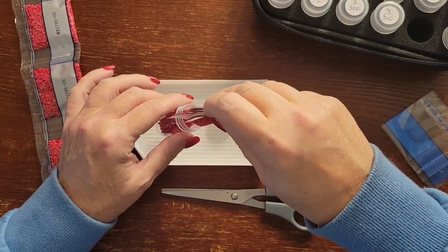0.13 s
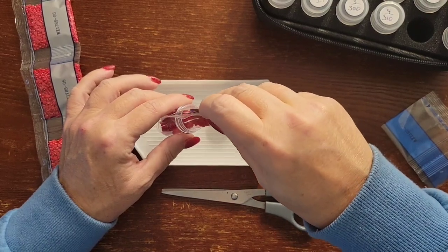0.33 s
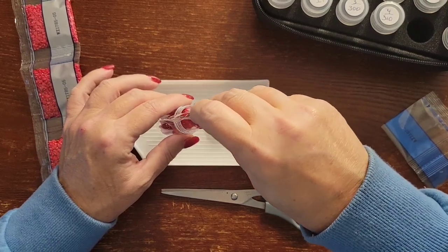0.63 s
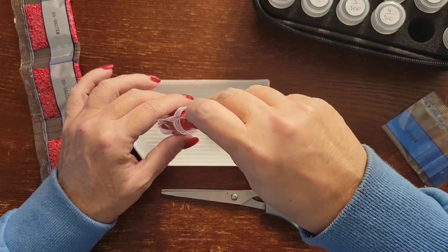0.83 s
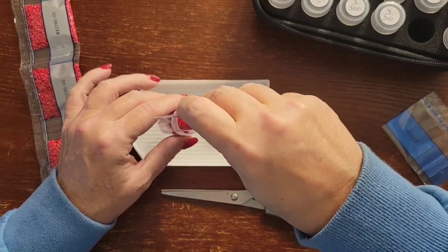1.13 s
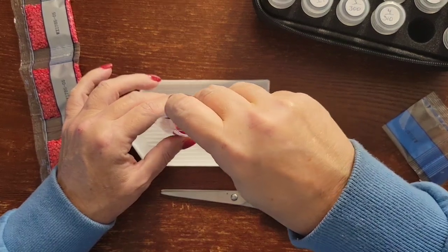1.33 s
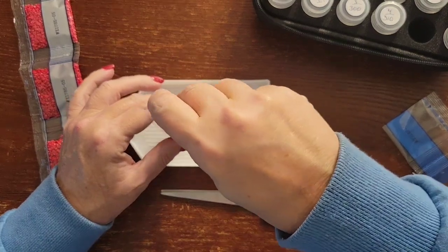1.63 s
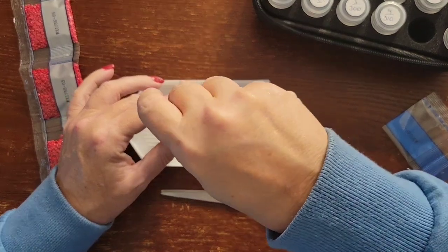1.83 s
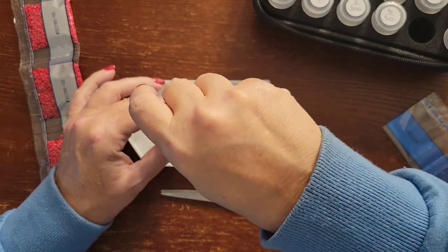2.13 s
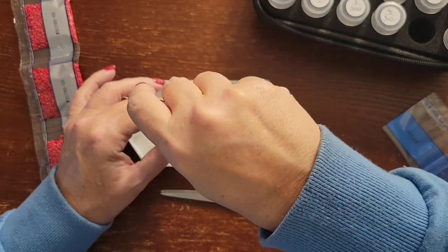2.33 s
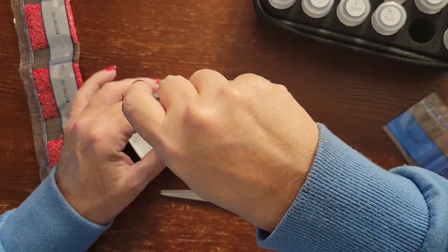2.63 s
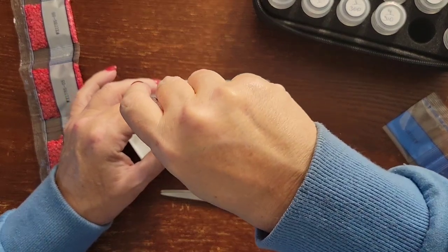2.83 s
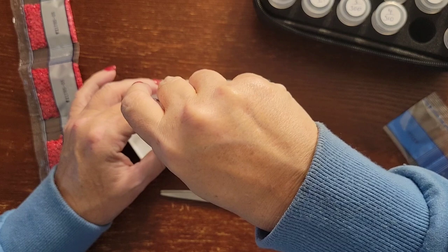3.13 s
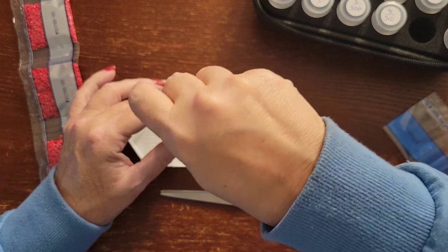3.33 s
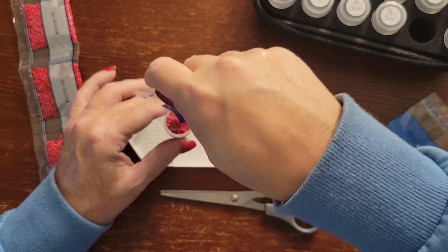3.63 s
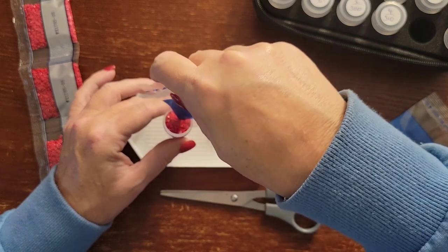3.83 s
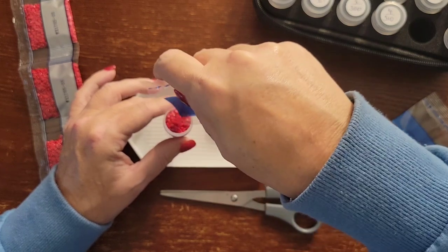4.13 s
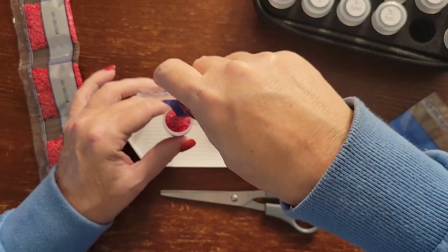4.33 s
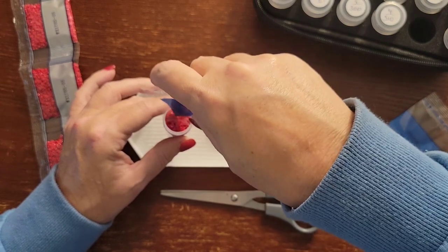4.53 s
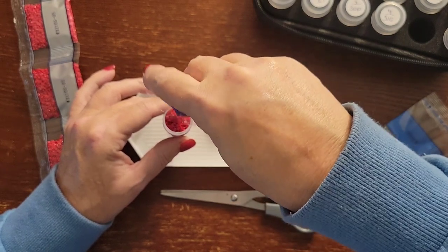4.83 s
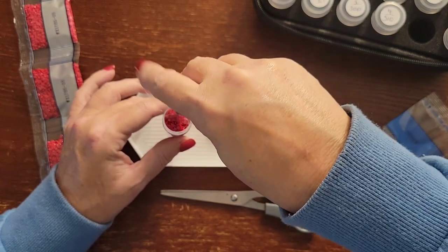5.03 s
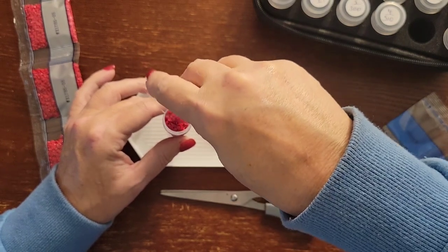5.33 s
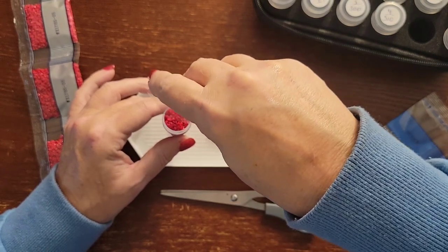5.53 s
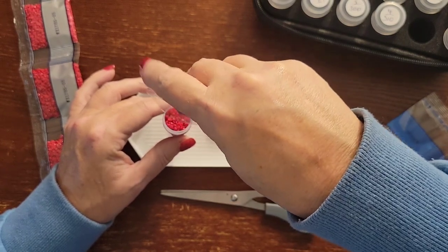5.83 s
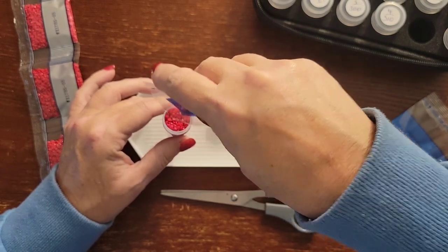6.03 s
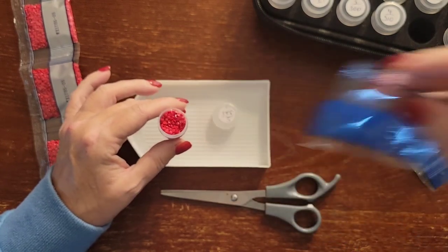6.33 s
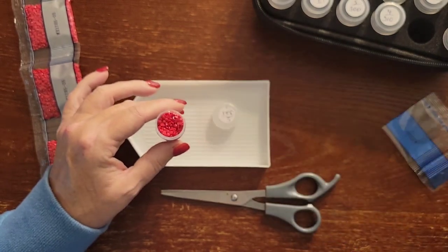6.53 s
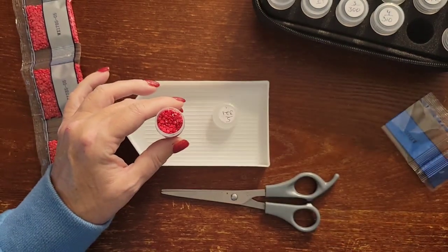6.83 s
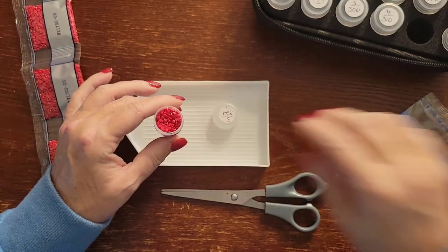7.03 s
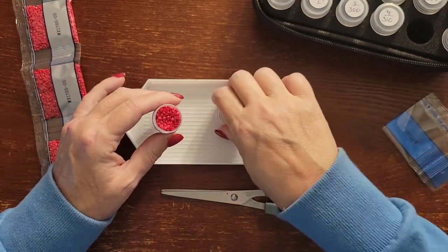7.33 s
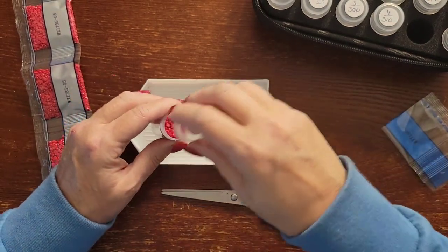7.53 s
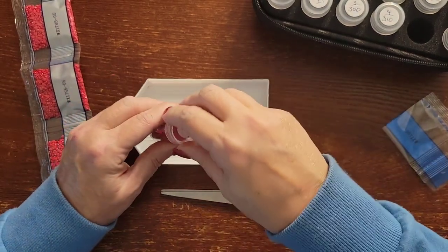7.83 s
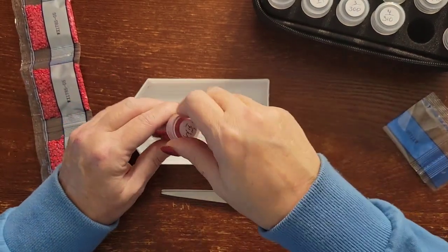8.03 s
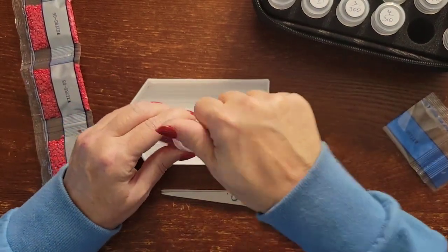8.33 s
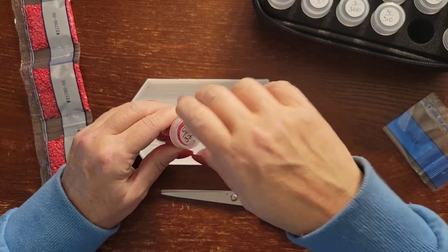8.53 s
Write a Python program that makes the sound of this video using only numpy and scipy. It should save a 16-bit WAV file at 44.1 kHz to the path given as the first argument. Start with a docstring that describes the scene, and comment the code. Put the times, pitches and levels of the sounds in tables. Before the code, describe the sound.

Close, dry handling sounds in a small hard room with faint hiss, low air and hum. From 0 s a thin trickle of tiny beads patters brightly into a small plastic jar, with sharp plastic snaps near 0.65, 1.5 and 2.1 s. From about 1 s the stream thickens into a dense granular rush, peaking around 1.7 and 2.2 s, then breaks into bursts and stops by 2.8 s; a soft low rumble swells near 1.5 s. A hard snap comes at 3.3 s, then light film ticks and scrapes. A crackling cluster of loud snaps hits at 4.7-4.8 s, followed by scattered small ticks until 6 s. Strong flicks of the bag sound at 6.2-6.4 s and a bright crinkling burst at 6.6-6.8 s. At 7.25 s a lid is picked up with a loud click, scrape and low bump; it clicks at 7.6 s, grates faintly around 8.1-8.2 s, and ends with a tick at 8.6 s.

```python
"""Beads poured into a small jar

Tiny beads pour from a thin plastic bag into a small jar on a tray: coloured streams of random clicks.
Film and plastic snap as filtered impulses; film crinkles, scrapes and lid grating are shaped slips.
A small hard room answers snaps and hands; low bumps, air, hums and a rumble swell lie beneath.
"""
import sys
import numpy as np
from scipy import signal
from scipy.fft import rfft, irfft
from scipy.io import wavfile
from scipy.ndimage import uniform_filter1d

SR = 44100
rng = np.random.default_rng(int(sys.argv[2]) if len(sys.argv) > 2 else 0)


def int16_out(signal):
    """Quantize to a 16-bit WAV file."""
    q = np.round(np.clip(np.atleast_2d(signal).T, -1, 1) * 32767)
    wavfile.write(sys.argv[1], SR, q.astype(np.int16))


N = 382645


def gain_of(db):
    """Amplitude ratio of a level in dB."""
    return 10 ** (np.asarray(db) / 20)


def evened(x):
    """Scale to unit RMS."""
    return x / np.sqrt(np.mean(x ** 2) + 1e-20)


def peaked(x):
    """Scale to unit peak."""
    return x / (abs(x).max() + 1e-12)


def read(points, hz):
    """Interpolate (Hz, value) points over log frequency."""
    f, value = np.transpose(points)
    return np.interp(np.log(hz + 1), np.log(f + 1), value)


def add(mix, s, sound):
    """Mix a sound in at s seconds, cut at the end of the mix."""
    part = mix[round(s * SR):][:len(sound)]
    part += sound[:len(part)]


def ring(x, hz, width):
    """A two-pole resonance."""
    r = np.exp(-np.pi * width / SR)
    return signal.lfilter([1, 0, -1], [1, -2 * r * np.cos(2 * np.pi * hz / SR), r * r], x)


def band(x, lo_hz, hi_hz):
    """Butterworth band-pass."""
    return signal.sosfilt(signal.butter(2, [lo_hz, hi_hz], "bandpass", fs=SR, output="sos"), x)


def coloured(x, points):
    """Shape the spectrum by (Hz, dB) points, at unit RMS."""
    gain = gain_of(read(points, np.fft.rfftfreq(len(x), 1 / SR)))
    return evened(irfft(rfft(x) * gain, len(x)))


def grains(per_s, spread_db):
    """Sparse clicks of random sign and size, at unit RMS."""
    sign, size, chance = rng.standard_normal(N), rng.exponential(1, N), rng.random(N)
    size_gain = gain_of(spread_db * np.minimum(size, 3))
    return evened(sign * size_gain * (chance < per_s / SR))


def played(x, s, db, tilt, patchy_db, flicker_db):
    """Give a steady stream its level, tilt about 5 kHz [dB per octave], drifting patches and quick flicker."""
    hz, t, z = signal.stft(x, SR, nperseg=256, noverlap=192)
    tilt_at_t = np.interp(t, s, tilt * np.ones(len(s)))
    slope = gain_of(np.outer(np.log2((hz + 100) / 5000), tilt_at_t))
    # the tilt leaves the power unchanged
    power = np.mean(abs(z) ** 2, 1)
    slope /= np.sqrt(power @ slope ** 2 / power.sum())
    patches = rng.standard_normal((len(t), len(hz))).T
    patches = evened(uniform_filter1d(uniform_filter1d(patches, size=12, axis=0), size=14, axis=1))
    flicker = evened(uniform_filter1d(rng.standard_normal(len(t)), size=9))
    level = gain_of(np.interp(t, s, db, -120, -120) + patchy_db * patches + flicker_db * flicker)
    return signal.istft(z * slope * level, SR, nperseg=256, noverlap=192)[1][:N]


def causal(gain):
    """Minimum-phase impulse response of this magnitude, by folding the cepstrum."""
    cepstrum = irfft(np.log(gain + 1e-4))
    cepstrum[1:len(gain) - 1] *= 2
    cepstrum[len(gain):] = 0
    return irfft(np.exp(rfft(cepstrum)))


def beads():
    """Random bead impacts, thousands a second; the jar's modes ring in the thin trickle only."""
    # thin trickle into the nearly empty jar: (time [s], level [dB])
    trickle = [(0, -42.5), (.15, -47.5), (.24, -43.5), (.4, -47.5), (.7, -40.5), (.95, -45.5), (1.1, -42),
               (1.3, -46.5), (2, -48)]
    # thick stream of beads onto beads: (time [s], level [dB])
    pour = [(.95, -53), (1.1, -45.5), (1.41, -38.5), (1.67, -35.5), (1.95, -41), (2.04, -49.5),
            (2.19, -33.5), (2.34, -52), (2.45, -38.5), (2.59, -40), (2.72, -65), (2.85, -70)]
    # trickle spectrum: (frequency [Hz], relative level [dB per Hz])
    trickle_colour = [(290, -39), (500, -1.5), (1010, -8.5), (1750, -4.5), (3430, -6.5), (5200, -9),
                      (5830, -7.5), (10800, -8), (15500, -16.5)]
    # pour spectrum: (frequency [Hz], relative level [dB per Hz])
    pour_colour = [(290, -17), (500, -12), (839, -3.5), (1250, -10), (3280, -3.5), (3740, 1.5), (4440, -3),
                   (4840, 1.5), (9930, 1.5), (15500, -12.5)]
    # jar resonances: (frequency [Hz], width [Hz], level [dB re dry trickle])
    jar_modes = [(1770, 250, -13), (3760, 250, -15), (5170, 300, -10), (6300, 250, -15), (10000, 500, -13),
                 (11200, 600, -10)]
    trickle_tilt_db_per_octave, pour_tilt_db_per_octave = 2.04, 0.23  # at 0 s
    brighten_db_per_octave_per_s = 0.45  # the beads sound brighter as the jar fills

    few = coloured(grains(per_s=4000, spread_db=1.8), trickle_colour)
    jar = sum(gain_of(db) * evened(ring(few, hz, w)) for hz, w, db in jar_modes)
    many = coloured(grains(per_s=5000, spread_db=-0.5), pour_colour)

    trickle_s, trickle_db = np.transpose(trickle)
    trickle_tilt = trickle_tilt_db_per_octave + brighten_db_per_octave_per_s * trickle_s
    thin = played(evened(few + jar), trickle_s, trickle_db, trickle_tilt, patchy_db=1.5, flicker_db=1.54)

    pour_s, pour_db = np.transpose(pour)
    pour_tilt = pour_tilt_db_per_octave + brighten_db_per_octave_per_s * pour_s
    thick = played(many, pour_s, pour_db, pour_tilt, patchy_db=2.2, flicker_db=1.5)
    return thin + thick


def snap(db, ring_hz, bands_db, chatter_s, noise):
    """One sharp release and a dying chatter of smaller slips pass through the colour of the plastic."""
    # knock, mid, crack and tick bands: (low edge [Hz], high edge [Hz])
    snap_bands = [(400, 1500), (1500, 3000), (3000, 9000), (9000, 16000)]
    t, hz = np.arange(len(noise)) / SR, np.fft.rfftfreq(1024, 1 / SR)
    drive = .22 * noise * np.exp(-t / max(chatter_s, 1e-4))
    drive[0] = 1
    # a narrow band needs more gain per Hz to reach the same peak
    per_hz = []
    for d, (lo, hi) in zip(bands_db, snap_bands):
        per_hz.append((np.sqrt(lo * hi), d - 20 * np.log10(hi - lo)))
    low_end, high_end = (250, per_hz[0][1] - 20), (16000, per_hz[-1][1] - 19)
    spread = gain_of(read([low_end] + per_hz + [high_end], hz))
    width_hz = 250 + 0.098 * ring_hz
    bump = 0.62 / width_hz / (1 + ((hz - ring_hz) / width_hz) ** 2) ** 2
    response = causal(np.hypot(spread, bump))[:400]
    return gain_of(db) * peaked(np.convolve(drive, response))


def snaps():
    """Snaps of film and plastic, heard directly with chatter and from the room without it."""
    # (time [s], peak before the room and limiter [dB], ring [Hz],
    #  low knock [dB re ring], broad crack [dB re ring])
    snap_events = [(.035, -29.5, 1700, -10, -15), (0.3607, -20, 5300, -4, 5), (.497, -27, 1670, 2.5, 9),
                   (.641, -3, 8500, -11, 0), (1.4877, 0, 3780, -11, 16), (1.7473, -26, 6140, -33, -7),
                   (1.753, -19, 6700, -50, -5), (2.045, -23, 8000, -14, 9),
                   (2.1361, 0.5, 4900, -32.5, 19.5), (2.473, -28, 1280, 15, -3),
                   (2.53, -22, 10300, -37, -9), (2.544, -17, 8230, -45, -1), (2.6372, -22.5, 4970, -24, 9),
                   (2.65, -25.5, 4840, -38, 9), (2.6804, -25, 12230, -40, -13),
                   (2.705, -27.5, 12100, -19, -15), (2.73, -33, 12320, -45, -15),
                   (2.7653, -32, 12000, -27, -17), (2.786, -36, 12300, -40, -16),
                   (3.2904, -26, 3750, -21, -13), (3.3268, 0, 3660, -42, 8.5), (3.4926, -31, 4440, -10, 9),
                   (3.572, -29, 10200, -30, 11), (3.586, -36, 10400, -30, -8),
                   (3.6995, -30.5, 10000, -40, -1), (3.75, -28, 4800, -32, -3),
                   (3.7637, -29.5, 6440, -23, 0), (3.812, -25, 6700, -34, -3), (3.828, -22, 7350, -29, -2),
                   (3.8367, -26, 3600, -15, 5), (3.942, -12, 4330, -25, 10), (4.005, -32, 11410, -42, -12),
                   (4.0182, -28, 9100, -36, 2), (4.2212, -28, 4070, -17, 8), (4.2548, -22, 8160, -29, 0),
                   (4.2623, -25, 10000, -40, -11), (4.2707, -16, 6360, -45, 5),
                   (4.2813, -18.5, 6340, -38, 5), (4.4527, -37, 5750, -6, -8), (4.5698, -35, 4000, -29, 19),
                   (4.6996, -14, 2670, -19, -10), (4.7166, 0.5, 8600, -37, 3), (4.7253, -2, 10600, -20, 9),
                   (4.733, -7, 7080, -41, -6), (4.788, -25, 1200, 1, 14), (4.8168, -4.5, 8800, -12.5, 18),
                   (4.843, -31, 12500, -40, -13), (4.8786, -17.5, 11700, -25, -13),
                   (4.9085, -25.5, 1440, -10, 4), (4.931, -23, 9130, -37, -1), (4.9466, -21, 5670, -2, 2),
                   (4.9737, -27.5, 4610, -47, 8), (5.0204, -26, 1070, 0, 5), (5.071, -23.5, 5000, -29, 11),
                   (5.0816, -28, 1490, -17, 8), (5.0954, -28, 1900, -7, -7), (5.1582, -26, 10830, -40, -14),
                   (5.1818, -22.5, 4890, -19, 15), (5.2343, -25.5, 1050, -8, 7), (5.2975, -29, 1960, 1, 5),
                   (5.315, -36, 6800, -40, -5), (5.3389, -32, 11350, -40, 0),
                   (5.356, -27.5, 10400, -40, -13), (5.371, -24, 1020, -3.5, 4),
                   (5.3931, -34, 4800, -30, 7), (5.5003, -31.5, 5000, -16, 12),
                   (5.596, -28.5, 5440, -14, 12), (5.6817, -27.5, 6860, -1.5, -8),
                   (5.753, -28, 10400, -40, -9), (5.7613, -22.5, 5100, -22, 4), (5.884, -28, 5000, -27, 9),
                   (5.9836, -35, 9690, -30, -7), (6.001, -21, 4970, -20.5, -1),
                   (6.026, -33.5, 4070, -40, 0), (6.0919, -33, 10900, -36, -6),
                   (6.1385, -34, 7800, -48, 11), (6.2158, -10, 2930, -6.5, 4), (6.249, 3, 3060, -15, 5.5),
                   (6.3142, -15, 1660, -13.5, 10), (6.361, -26, 1850, -2, -8), (6.3998, -8.5, 4750, -8, 13),
                   (6.5328, -29.5, 1380, 5.5, -4), (6.5895, -3.5, 8400, -43.5, 3),
                   (6.6756, -19.5, 6500, -19.5, -12), (6.7498, -3, 8000, -37, -3),
                   (6.759, 6.5, 7600, -18, 2), (6.761, -1.5, 4650, -12.5, 7), (6.9358, -29, 11560, -35, 3),
                   (6.987, -24, 10080, -33, 12), (7.114, -34, 2100, -22, 11), (7.249, 0, 2610, -34.5, 9),
                   (7.2568, 3, 2650, -19, 8.5), (7.266, 0.5, 3740, -29, -4), (7.504, -36.5, 2410, -26, 3),
                   (7.6022, -24, 5200, -6, 9), (7.611, -15, 1380, -6, 7), (7.6141, -7, 3070, -33, 6.5),
                   (7.783, -33, 1840, 9, -22), (8.112, -29.5, 3700, -35, 7), (8.1533, -27, 2160, -31, -4),
                   (8.1735, -33, 7880, -40, -3), (8.1991, -31, 2300, -39, -8),
                   (8.2867, -32.5, 8570, -7, -17), (8.6047, -12.5, 9800, -15, 1)]
    mid_db, mid_per_knock_db, mid_per_crack_db = -2.5, 0.87, 0.74  # hollow mid follows knock and crack
    tick_db, tick_db_per_octave, tick_per_crack_db = -4.5, 4, 0.88  # treble tick; octaves about 5 kHz
    chatter_0db_s, chatter_growth = 0.0019, 0.11  # decay at 0 dB; weaker snaps chatter for less long
    room_ring_db, room_broaden_db, room_tick_db = -4.5, 1, -3.5  # duller, broader into the room

    near, far = np.zeros(N), np.zeros((3, N))
    noises = rng.standard_normal((len(snap_events), 600))
    for k, ((s, db, hz, knock_db, crack_db), noise) in enumerate(zip(snap_events, noises)):
        mid = mid_db + mid_per_knock_db * knock_db + mid_per_crack_db * crack_db
        tick = tick_db + tick_per_crack_db * crack_db + tick_db_per_octave * np.log2(hz / 5000)
        bands_db = np.array([knock_db, mid, crack_db, tick])
        chatter_s = chatter_0db_s * gain_of(chatter_growth * db)
        add(near, s, snap(db, hz, bands_db, chatter_s, noise))
        far_bands_db = bands_db + room_broaden_db + [0, 0, 0, room_tick_db]
        add(far[k % 3], s, snap(db + room_ring_db, hz, far_bands_db, chatter_s, 0 * noise))
    # each third of the snaps meets its own random tail
    return near + sum(room(x) for x in far)


def crinkle():
    """Bag and lid rubbed between fingers: sparse creases of film over a soft sliding hiss."""
    # (time [s], level [dB], brightness [dB per octave])
    rub = [(3.15, -90, -23), (3.29, -58, 0), (3.87, -63, -0.5), (4.02, -84, 13), (4.26, -48, -6.5),
           (4.66, -70.5, -1.5), (4.74, -31.5, 0.5), (4.89, -66, -4.5), (5.1, -55, -2), (5.4, -76, -3),
           (5.98, -74.5, 0), (6.2, -58, -2), (6.3, -48, -4), (6.45, -53, -1), (6.66, -61.5, -0.5),
           (6.78, -25.5, 0), (6.84, -42, 0), (7.24, -60.5, -4), (7.37, -37, -9.5), (7.55, -50, -6.5),
           (8.0, -67, 0), (8.18, -53.5, -1), (8.37, -49.5, -7), (8.68, -44, -7)]
    # film spectrum: (frequency [Hz], relative level [dB per Hz])
    film_colour = [(290, -9), (500, -9.5), (586, -15), (1250, -10), (2330, -9.5), (4570, -6.5),
                   (4980, -9.5), (8980, -4.5), (15500, -14)]
    creases = grains(per_s=170, spread_db=2.0) + 2.8 * rng.standard_normal(N)
    return played(coloured(creases, film_colour), *np.transpose(rub), patchy_db=2.9, flicker_db=3.5)


def scrapes():
    """Short scrapes of film or lid thread: band-passed dense slips that start abruptly and fade."""
    # (time [s], length [s], level before fades [dB], centre [Hz])
    scrape_events = [(3.227, 0.094, -55.5, 8000), (3.557, 0.044, -53.5, 7000), (3.655, 0.022, -53, 7000),
                     (3.756, 0.024, -53, 6030), (3.813, 0.053, -48, 7150), (3.885, 0.043, -45.5, 6770),
                     (4.143, 0.046, -62, 6000), (4.245, 0.061, -40, 7200), (4.328, 0.073, -42, 6460),
                     (4.403, 0.036, -43.5, 6750), (4.598, 0.064, -58.5, 7000), (4.939, 0.028, -42, 4970),
                     (5.077, 0.021, -43.5, 4170), (5.275, 0.028, -46.5, 4900), (5.668, 0.073, -56, 4870),
                     (6.02, 0.059, -57, 4950), (6.155, 0.072, -51.5, 6240), (6.322, 0.05, -48, 5000),
                     (6.673, 0.061, -40.5, 7000), (6.75, 0.31, -41, 6230), (7.245, 0.0094, -32, 3000),
                     (7.248, 0.074, -26.5, 3500), (7.604, 0.039, -40.5, 3860), (7.954, 0.058, -54.5, 9400),
                     (8.113, 0.061, -50.5, 4170), (8.198, 0.055, -61, 5000)]
    slips = evened(grains(per_s=4400, spread_db=3.0) + 1.8 * rng.standard_normal(N))
    out = np.zeros(N)
    for s, length_s, db, hz in scrape_events:
        u = np.arange(0, 1, 1 / (length_s * SR))
        edges_hz = 0.19 * hz, min(2.07 * hz, 15000)
        rough = slips[round(s * SR):][:len(u)]
        body = evened(band(band(rough, *edges_hz), *edges_hz))
        add(out, s, gain_of(db) * body * np.minimum(u / 0.1, 1) * (1 - u ** 3))
    return out


def lid():
    """Lid lifted and screwed on: quick slips on the tray or thread excite its broad modes."""
    # (time [s], length [s], level before fades [dB], brightness [dB per octave about 2 kHz])
    grates = [(7.262, 0.084, -30, 10), (7.618, 0.07, -37, -14), (8.113, .06, -55, 2.5),
              (8.2, 0.055, -48, 8)]
    # lid resonances: (frequency [Hz], width [Hz], relative level before brightness [dB])
    lid_modes = [(1200, 350, -2), (2370, 360, 2), (3070, 510, -10), (5070, 600, -4)]
    slips, out = grains(per_s=3000, spread_db=0.0), np.zeros(N)
    for s, length_s, db, tilt_db in grates:
        u = np.arange(0, 1, 1 / (length_s * SR))
        rough = slips[round(s * SR):][:len(u)]
        body = np.zeros(len(rough))
        for hz, width_hz, mode_db in lid_modes:
            mode_gain = gain_of(mode_db + tilt_db * np.log2(hz / 2000))
            body += mode_gain * evened(ring(rough, hz, width_hz))
        add(out, s, gain_of(db) * evened(body) * np.minimum(u / 0.088, 1) * (1 - u) ** 1.6)
    return out


def bumps():
    """Soft bumps of hand and jar on the table: short, exponentially dying low tones."""
    # (time [s], level at onset [dB], frequency [Hz], t60 [s])
    bump_events = [(2.688, -27, 74, .073), (4.789, -34.5, 70.8, 0.63), (6.5, -27.5, 236, 0.026),
                   (7.249, -30, 116, 0.34), (7.258, -30, 181, .35), (8.6, -44, 60, .24)]
    out, t = np.zeros(N), np.arange(SR // 4) / SR
    for s, db, hz, t60_s in bump_events:
        attack = np.minimum(t / 0.00076, 1)
        add(out, s, gain_of(db - 60 * t / t60_s) * np.sin(2 * np.pi * hz * t) * attack)
    return out


def room(x):
    """A few wall echoes and a diffuse tail that dies band by band."""
    # tail decay: (frequency [Hz], t60 [s])
    tail_decay = [(500, 0.4), (1300, 0.32), (3500, 0.3), (9000, 0.29), (15000, .17)]
    # wall echoes: (delay [s], level [dB re whole tail])
    echoes = [(.0079, -16), (0.0147, -9.5), (0.016, -15)]
    taps = np.zeros(SR // 2)
    at = np.arange(120, len(taps) - 20, 12)
    at = at + rng.integers(0, 12, len(at))
    taps[at] = rng.choice([-1., 1.], len(at))
    taps *= np.minimum(np.arange(len(taps)) / SR / 0.0034, 1)  # builds up over the first reflections
    hz, t, z = signal.stft(taps, SR, nperseg=128)
    decay = gain_of(-60 * t / read(tail_decay, hz)[:, None])
    tail = signal.istft(z * decay, SR, nperseg=128)[1]
    tail /= np.linalg.norm(tail)
    for s, db in echoes:
        # uneven surfaces smear each echo
        scatter = rng.standard_normal(40) * np.exp(-np.arange(40) / 12)
        add(tail, s, gain_of(db) * scatter / np.linalg.norm(scatter))
    return signal.fftconvolve(x, tail)[:N]


def background():
    """Coloured noise for air and hiss, narrow resonated noise for wavering hums, a swell of rumble."""
    # low room air: (frequency [Hz], relative level [dB per Hz])
    air_colour = [(12, -29), (20, -7.5), (64, 2.5), (125, -2), (216, -3), (275, -14), (350, -15.5),
                  (484, -18), (718, -22), (1200, -33), (1560, -74), (2640, -120)]
    # hiss: (frequency [Hz], relative level [dB per Hz])
    hiss_colour = [(700, -20), (1100, -3), (1500, -6), (2100, -11), (2800, -8), (3700, -4), (5000, -4),
                   (6500, -5), (8000, -8), (9700, -5), (11000, -12), (15500, -16)]
    # hums: (frequency [Hz], width of each of two passes [Hz], level [dB])
    hum_modes = [(61, 14, -48), (219, 16, -55), (331, 16, -66), (820, 60, -72), (1100, 60, -77),
                 (1760, 200, -77), (2380, 150, -82), (4000, 80, -76)]
    air_db, hiss_db, swell_db = -46.5, -67, -44
    swell_s, swell_rise_s, swell_fall_s = 1.55, 0.32, 0.56

    air, hiss, hums, swell = rng.standard_normal((4, N))
    out = gain_of(air_db) * coloured(air, air_colour) + gain_of(hiss_db) * coloured(hiss, hiss_colour)
    out += sum(gain_of(db) * evened(ring(ring(hums, hz, w), hz, w)) for hz, w, db in hum_modes)
    t = np.arange(N) / SR - swell_s
    shape = np.exp(-(t / np.where(t < 0, swell_rise_s, swell_fall_s)) ** 2)
    rumble = evened(band(band(swell, 120, 360), 120, 360))
    return out + gain_of(swell_db) * shape * rumble


def scene():
    """Sum the sources; the hand sounds also excite the room."""
    hands = beads() + crinkle() + scrapes() + lid()
    hands_in_room = gain_of(-7.0) * room(hands)
    return (snaps() + hands + hands_in_room + bumps() + background())[None]


def record(dry):
    """A soft limit on the sharpest peaks, then the band limit."""
    edge_hz = 15650
    soft = 1.22 * np.tanh(dry / 1.364)
    lowpass = signal.firwin(511, edge_hz, window=("kaiser", 9), fs=SR)
    return signal.oaconvolve(soft, lowpass[None], "same")


dry = scene()
out = record(dry)
int16_out(out)
```